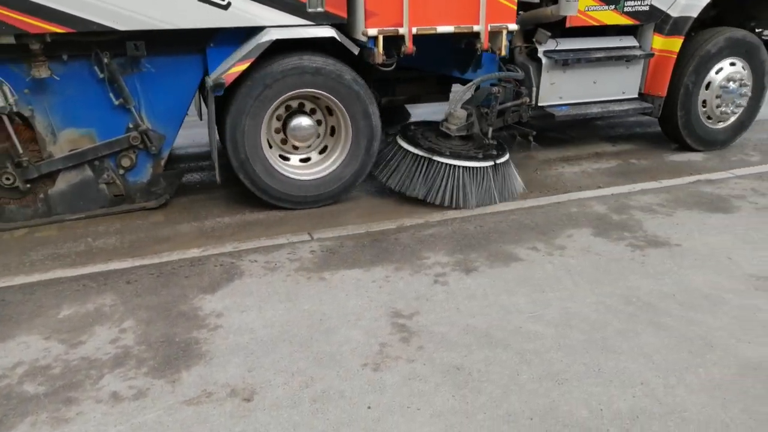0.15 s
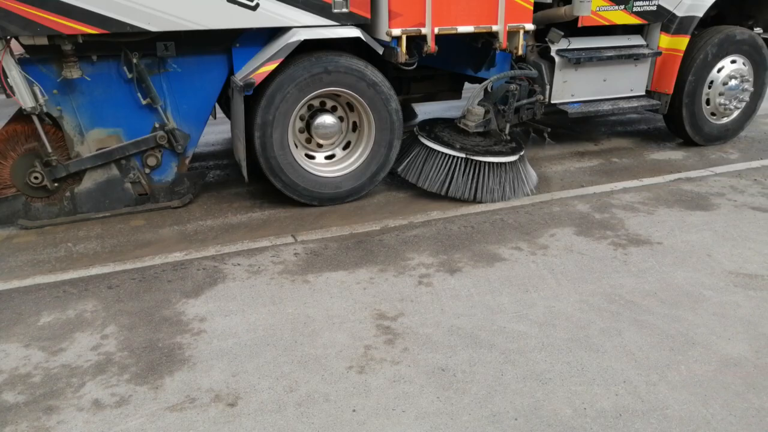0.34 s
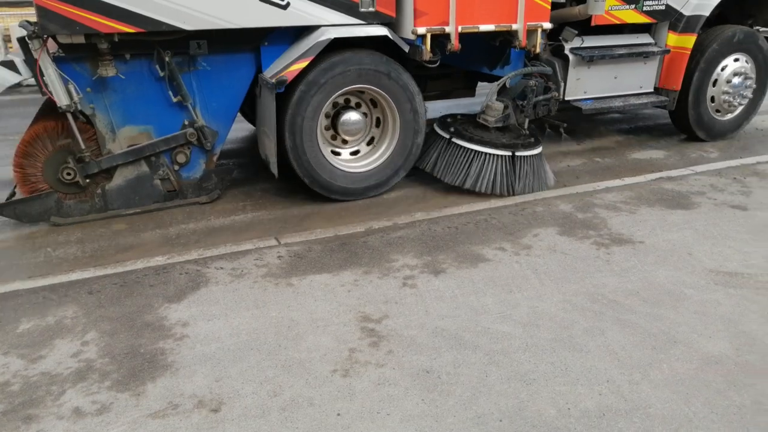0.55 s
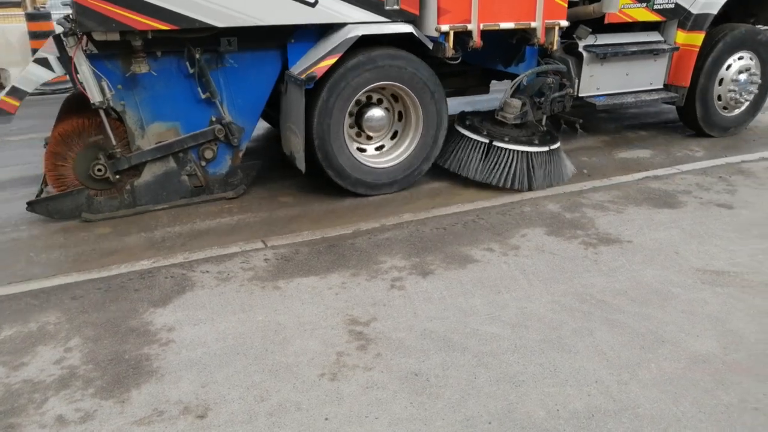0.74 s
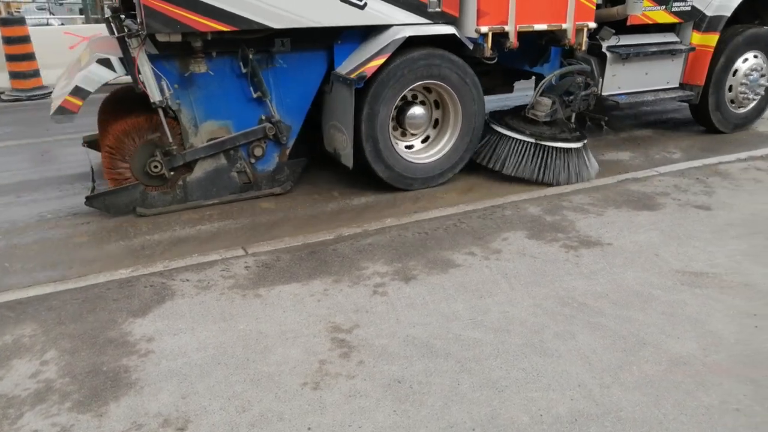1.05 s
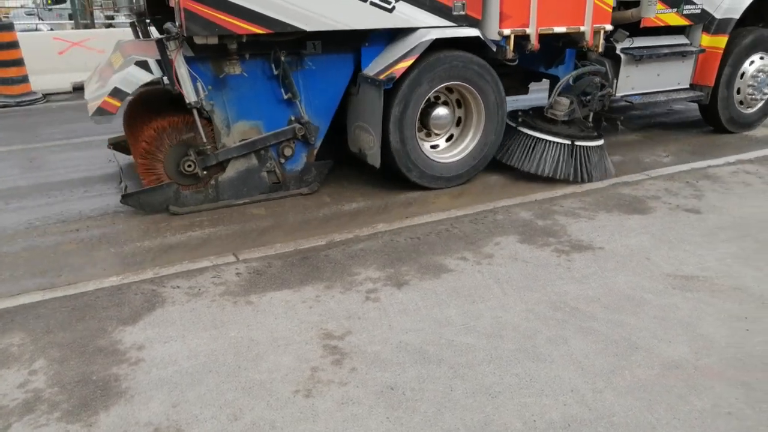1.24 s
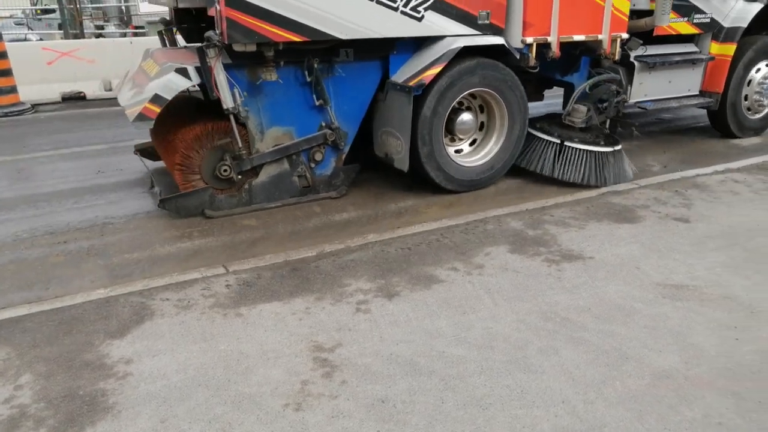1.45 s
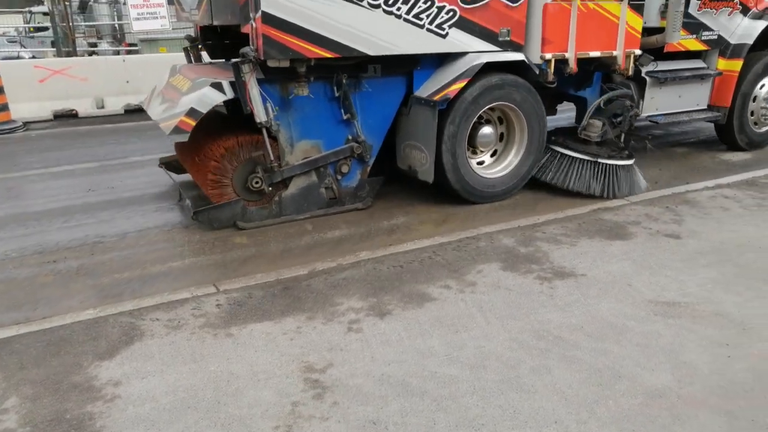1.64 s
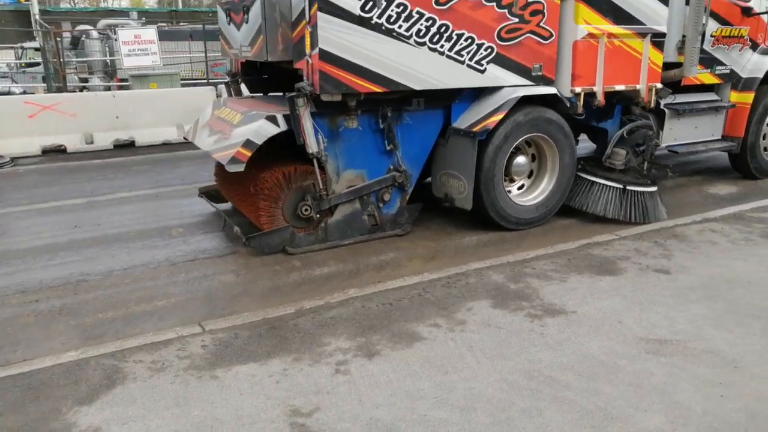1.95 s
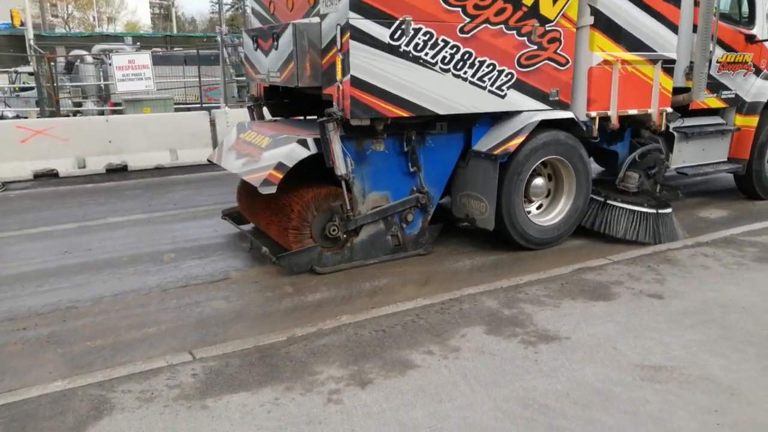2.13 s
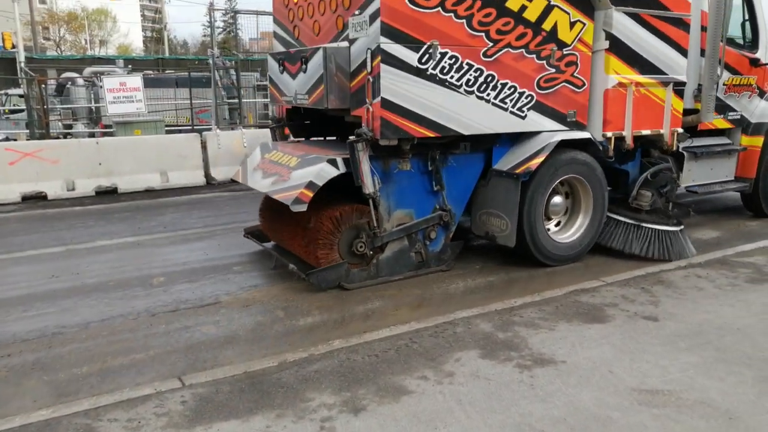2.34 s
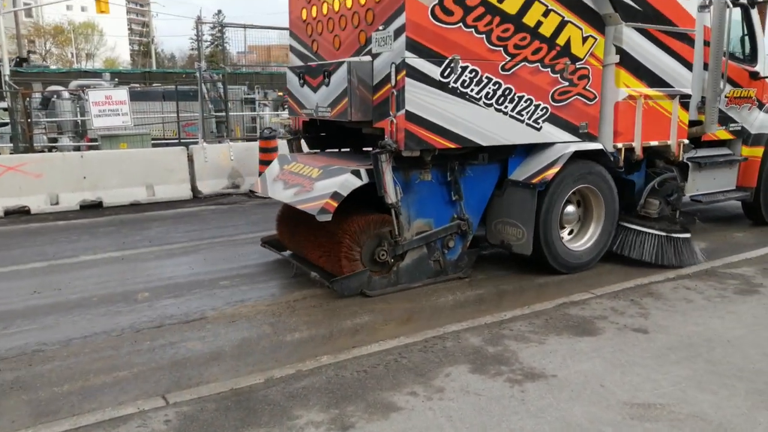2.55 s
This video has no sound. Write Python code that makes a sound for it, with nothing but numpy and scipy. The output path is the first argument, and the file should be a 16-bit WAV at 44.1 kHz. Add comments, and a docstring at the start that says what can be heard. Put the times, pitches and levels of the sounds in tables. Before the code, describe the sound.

Low diesel hum and machinery rumble of a sweeper truck, with brushes softly scratching wet road.

```python
"""A street sweeper truck rolls slowly away: its diesel hums in sine orders of a nearly steady firing rate.
Its machinery rumbles as coloured noise, and soft knocks ring the hopper as decaying sines.
The brushes hiss on wet asphalt as shaped noise. The hiss arrives directly and off the road and bodywork,
so it gathers in a few bands that drift as the truck moves."""
import sys
import numpy as np
from scipy import signal
from scipy.fft import rfft, irfft, next_fast_len
from scipy.io import wavfile
from scipy.ndimage import uniform_filter1d, map_coordinates

SR = 44100
rng = np.random.default_rng(int(sys.argv[2]) if len(sys.argv) > 2 else 0)


def persist_wave(psi):
    """Save psi, clipped to +-1, as 16-bit WAV."""
    counts = np.round(np.clip(psi, -1, 1) * 32767).astype(np.int16)
    wavfile.write(sys.argv[1], SR, np.atleast_2d(counts).T)


N = 118629  # samples


def amp(db):
    """dB to gain."""
    return 10 ** (np.asarray(db) / 20)


def unit(x):
    """Scaled to rms 1."""
    return x / np.sqrt(np.mean(x ** 2) + 1e-20)


def curves(rows, t=None):
    """Each column after the time, read at times t (every sample by default)."""
    s, *cols = np.transpose(rows)
    if t is None:
        t = np.arange(N) / SR
    return [np.interp(t, s, c) for c in cols]


def wobble(rate):
    """A smooth random curve, rate knots a second."""
    knots = rng.standard_normal(int(N * rate / SR) + 4)
    return map_coordinates(knots, [np.arange(N) * rate / SR])


def filtered(x, response):
    """x times a response of frequency."""
    m = next_fast_len(N + 8192)
    gain = response(np.fft.rfftfreq(m, 1 / SR))
    return irfft(rfft(x, m) * gain, m)[..., :N]


def noise(points, white=None):
    """Noise of rms 1 coloured by (Hz, dB) points, closed at both ends."""
    f, v = np.transpose(points)
    if white is None:
        white = rng.standard_normal(N)

    def colour_gain(hz):
        return amp(np.interp(np.log(hz + 1), np.log(f + 1), v, -120, -120))

    return unit(filtered(white, colour_gain))


def patches(x, patchy_db, size):
    """Random gain patches, size in (frequency bins, time frames)."""
    z = signal.stft(x, nperseg=512)[2]
    field = uniform_filter1d(rng.standard_normal(z.shape), size[0], 0)
    field = uniform_filter1d(field, size[1], 1)
    return signal.istft(z * amp(patchy_db * unit(field)), nperseg=512)[1][:N]


def steady(colour):
    """Noise with its chance swells evened out, as from machinery that turns at a constant speed."""
    evenness = 0.5  # 0 = free noise, 1 = no chance swells
    z = signal.stft(rng.standard_normal(N), nperseg=4096, noverlap=3072)[2]
    even = signal.istft(z / np.abs(z) ** evenness, nperseg=4096, noverlap=3072)[1][:N]
    return noise(colour, even)


def machinery():
    """Deep, body and hollow rumble of pumps, conveyor and hopper; the hollow parts rattle unevenly."""
    # rumble layers: t/s, deep level/dB, body level/dB, hollow low-mid level/dB, upper hollow level/dB
    rumble = [(0, -33, -31.5, -36.5, -51), (.06, -26.5, -30.5, -35.5, -39.5),
              (.2, -31.5, -26.5, -45, -50.5), (.4, -32.5, -32, -45, -46), (.65, -31.5, -27.5, -41.5, -49),
              (.8, -35.5, -31, -41, -49.5), (1.08, -30, -27, -38, -45.5), (1.3, -32, -34.5, -35.5, -45.5),
              (1.4, -30, -35.5, -45, -43), (1.55, -37, -35, -38.5, -52), (1.75, -34, -33.5, -45, -40.5),
              (1.95, -25.5, -33.5, -41, -41.5), (2.2, -30, -33.5, -34, -42), (2.28, -37, -33.5, -41, -37),
              (2.4, -30.5, -30.5, -47.5, -44.5), (2.69, -36, -32.5, -43, -46.5)]
    # colour of each layer: f/Hz, relative density/dB per Hz
    deep = [(12, -9), (16, -6), (45, -7.5), (62, -5), (78, -3), (95, 3), (110, -5.5), (135, -16.5)]
    body = [(100, -12.5), (128, -1.5), (145, 1), (157, -5), (169, 3.5), (183, -8), (220, -4), (260, -13.5),
            (320, -21.5)]
    hollow_low = [(220, -8.5), (265, 0.5), (320, -2.5), (370, -0.5), (420, -5.5), (500, -21.5)]
    hollow_high = [(370, -15), (430, -2), (490, 2), (560, -7), (630, -7), (720, -20), (850, -32)]
    rattle_db = 1.4

    def rattle(colour):
        return unit(amp(rattle_db * wobble(16)) * steady(colour))

    deep_db, body_db, low_db, high_db = curves(rumble)
    out = amp(deep_db) * steady(deep)
    out += amp(body_db) * steady(body)
    out += amp(low_db) * rattle(hollow_low)
    out += amp(high_db) * rattle(hollow_high)
    return out


def knocks():
    """Each soft knock rings the hopper's modes with new strengths and slightly shifted pitches."""
    # soft knocks in the hopper: t/s, level/dB
    hits = [(0.035, -26), (1.14, -30), (1.18, -17.5), (1.234, -15.5), (1.365, -22)]
    # ringing modes of the hopper: f/Hz, level/dB, 60 dB decay time/s
    modes = [(296, -6, .1), (355.6, 2, 0.12), (441.7, -6.5, 0.18), (500.3, -5, 0.14)]
    mode_scatter_db, pitch_scatter, rise_s = 1.5, 0.016, 0.012  # pitch scatter as a fraction
    out = np.zeros(N + SR)
    t = np.arange(SR // 4) / SR
    soft_onset = 1 - np.exp(-t / rise_s)
    for s, db in hits:
        ring = np.zeros(len(t))
        for hz, level_db, t60 in modes:
            strength, detune = rng.standard_normal(2)
            decay = amp(level_db + mode_scatter_db * strength - 60 * t / t60)
            ring += decay * np.sin(2 * np.pi * hz * (1 + pitch_scatter * detune) * t)
        start = round(s * SR)
        out[start:start + len(t)] += amp(db) * ring * soft_onset
    return out[:N]


def brushes():
    """Bristle scratches shaped into drifting bands over a broad hiss and a patchy treble."""
    # drifting bands of the hiss, one list each: t/s, centre f/Hz, width/Hz, level/dB
    drifting_bands = [
        [(0, 1570, 90, -54), (.12, 1520, 90, -44.5), (.25, 1510, 70, -43.5), (.47, 1480, 90, -43.5),
         (.62, 1450, 90, -59), (2.1, 1460, 91, -63), (2.35, 1530, 90, -49.5), (2.49, 1550, 80, -46.5),
         (2.55, 1480, 80, -46), (2.64, 1450, 80, -45)],
        [(0, 1390, 100, -49), (.15, 1270, 90, -41), (.3, 1270, 100, -52.5), (.48, 1275, 100, -44.5),
         (.7, 1290, 121, -50), (1, 1290, 129, -44), (1.3, 1260, 120, -49), (1.55, 1300, 101, -46.5),
         (1.68, 1280, 110, -55), (1.9, 1310, 120, -43.5), (2.1, 1350, 133, -51.5), (2.35, 1315, 99, -41.5),
         (2.52, 1280, 109, -52), (2.69, 1260, 100, -45)],
        [(0, 2430, 172, -44), (.15, 2430, 190, -40), (.5, 2400, 202, -39.5), (.7, 2220, 143, -41),
         (1.05, 2140, 130, -38.5), (1.22, 2200, 160, -43.5), (1.36, 2170, 171, -52), (1.55, 2250, 140, -41.5),
         (1.78, 2130, 130, -46), (1.95, 2240, 130, -56.5), (2.69, 2300, 130, -58.5)],
        [(0, 2830, 149, -46.5), (.2, 2970, 150, -45), (.6, 2940, 150, -47), (1, 2700, 200, -45),
         (1.3, 2500, 170, -48.5), (1.6, 2560, 170, -57), (1.85, 2610, 124, -47), (2.3, 2640, 200, -43.5),
         (2.5, 2720, 200, -45), (2.69, 2700, 200, -47)],
        [(0, 3600, 149, -53), (.25, 3320, 130, -48), (.7, 3400, 150, -55.5), (1, 3300, 170, -46.5),
         (1.2, 3300, 130, -52.5), (1.45, 3370, 130, -47.5), (1.8, 3280, 130, -51.5), (2.05, 3500, 120, -49),
         (2.25, 3540, 170, -48), (2.43, 3770, 140, -43), (2.55, 3690, 131, -48.5), (2.69, 3820, 121, -46)],
        [(0, 3830, 150, -46.5), (.2, 3830, 180, -47.5), (.45, 3660, 150, -59), (1.4, 3800, 150, -67),
         (1.6, 3950, 150, -48), (1.77, 4000, 188, -42.5), (1.9, 4100, 200, -48), (1.97, 4200, 200, -56.5),
         (2.69, 4350, 200, -66)],
        [(0, 4430, 170, -47), (.3, 4360, 170, -52), (.45, 4970, 220, -50), (.65, 4870, 200, -43.5),
         (.9, 4930, 180, -44), (.97, 4960, 170, -39.5), (1.12, 4860, 172, -40.5), (1.35, 5000, 200, -45.5),
         (1.7, 4960, 250, -49.5), (1.9, 5180, 201, -55.5), (2.25, 4970, 220, -48.5), (2.5, 4840, 200, -52),
         (2.69, 5060, 200, -55.5)],
        [(0, 5950, 220, -48), (.3, 5480, 300, -47.5), (.65, 5500, 250, -48.5), (.85, 5700, 250, -58),
         (1.3, 5600, 250, -53.5), (1.75, 5440, 200, -46), (1.92, 5630, 199, -51.5), (2.1, 5620, 180, -48),
         (2.4, 5540, 198, -49.5), (2.69, 5600, 248, -47.5)],
        [(0, 6740, 350, -51), (.3, 6360, 250, -57), (.6, 6240, 250, -56), (.8, 6400, 250, -71),
         (1.05, 6400, 300, -54), (1.35, 6600, 350, -54), (1.75, 6400, 300, -56), (2, 6480, 301, -69),
         (2.69, 6550, 300, -67)],
        [(0, 7500, 300, -55), (.3, 7600, 250, -54), (.58, 7350, 300, -49), (.76, 7300, 298, -59.5),
         (1, 7720, 250, -53), (1.35, 7960, 244, -59.5), (1.75, 7950, 300, -60), (2, 7300, 300, -66),
         (2.3, 7300, 250, -60), (2.69, 7300, 300, -64)],
    ]
    # broad hiss under the bands: t/s, level/dB; then its colour: f/Hz, relative density/dB per Hz
    hiss = [(0, -43.5), (.5, -43.5), (1.2, -43.5), (1.7, -44.5), (2.2, -45), (2.69, -48)]
    hiss_colour = [(500, 3), (700, -1.5), (1000, 1.5), (1750, -2.5), (3000, 0.5), (4400, -2.5), (6000, -2),
                   (7000, -14.5), (8500, -15.5), (9500, -34), (10500, -45)]
    # treble: t/s, level/dB; then its colour: f/Hz, relative density/dB per Hz
    treble_level = [(0.0, -57.5), (0.08, -55), (0.49, -58.5), (0.63, -56), (0.77, -63), (0.98, -58.5),
                    (1.18, -61.5), (2.31, -67), (2.69, -70.5)]
    air = [(4880, -20), (8300, -4.5), (9230, -6), (9900, -13.5), (11400, -11.5), (15000, -20)]
    skirt = 5  # steepness of a band's flanks

    grain = amp(1.12 * wobble(14) + 0.39 * wobble(120))  # slow and fast unevenness
    scratch = unit(rng.standard_normal(N) * grain)
    hz, t, z = signal.stft(scratch, SR, nperseg=1024)
    power = 0
    for band in drifting_bands:
        centre_hz, width_hz, db = curves(band, t)
        bell = (1 + ((hz[:, None] - centre_hz) / width_hz) ** 2 / skirt) ** -skirt
        power = power + amp(db) ** 2 * bell / bell.mean(0)  # level independent of width
    bands = signal.istft(z * np.sqrt(power), SR, nperseg=1024)[1][:N]

    broad = amp(curves(hiss)[0]) * noise(hiss_colour)
    treble = amp(curves(treble_level)[0]) * noise(air)
    out = patches(bands + broad, patchy_db=0.7, size=(2, 16))
    return out + patches(treble, patchy_db=2.5, size=(6, 40))


def engine():
    """Sines on the firing rate; uneven firing makes each order waver."""
    # lower orders: t/s, fundamental/dB rms, second/dB rms, third/dB rms, fourth/dB rms
    lower_orders = [(0, -31, -37.5, -56, -63), (.11, -25.5, -33.5, -54, -65), (.26, -23, -32.5, -60, -60),
                    (.36, -22, -54, -57, -65), (.5, -24.5, -38.5, -51, -67), (.6, -24, -35.5, -54, -62),
                    (.85, -29, -32.5, -51, -68), (1.1, -28, -32.5, -43, -61), (1.3, -28, -34.5, -45, -50),
                    (1.58, -29.5, -34, -52.5, -55), (1.8, -23.5, -31, -47.5, -51),
                    (2.0, -21, -32.5, -43, -42), (2.2, -23, -36, -45, -45), (2.38, -19, -37.5, -49.5, -47),
                    (2.69, -20.5, -40, -56, -61)]
    # upper orders, wavering about a fixed level: multiple of the firing rate, level/dB rms
    upper_orders = [(5, -58.5), (6, -65.5)]
    start_hz = 118.36  # firing rate until it climbs
    speed_up_s, speed_up_hz_per_s = 2.18, 2.23  # the firing rate climbs from this moment
    first_waver_db, second_waver_db, order_waver_db = 0.87, 0.8, 2.0

    first_db, second_db, third_db, fourth_db = curves(lower_orders)
    climb_s = np.clip(np.arange(N) / SR - speed_up_s, 0, None)
    rate_hz = start_hz + speed_up_hz_per_s * climb_s
    turn = 2 * np.pi * np.cumsum(rate_hz) / SR
    out = amp(first_db + first_waver_db * wobble(24.77)) * np.sin(turn)
    out += amp(second_db + second_waver_db * wobble(28.03)) * np.sin(2 * turn + 3.15)
    for k, db in [(3, third_db), (4, fourth_db)] + upper_orders:
        level = amp(db + order_waver_db * wobble(10.05))
        out += level * np.sin(k * turn + rng.uniform(0, 2 * np.pi))
    return np.sqrt(2) * out  # sine peak for a level in rms


def scene():
    """Nearly mono: a faint share with scrambled phases differs between the channels."""
    side_db = -30  # relative to the mid
    mid = machinery() + knocks() + brushes() + engine()
    z = signal.stft(mid, SR, nperseg=1024)[2]
    scrambled = z * np.exp(2j * np.pi * rng.random(z.shape))
    side = amp(side_db) * signal.istft(scrambled, SR, nperseg=1024)[1][:N]
    return np.array([mid + side, mid - side])


def record(dry):
    """A sharp band limit removes everything from its top frequency up."""
    top_hz = 15176
    return filtered(dry, lambda hz: hz < top_hz)


dry = scene()
out = record(dry)
persist_wave(out)
```